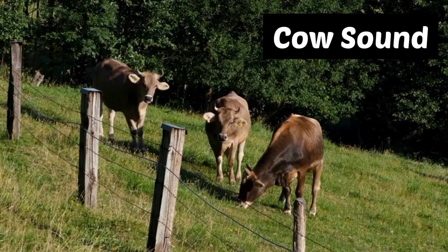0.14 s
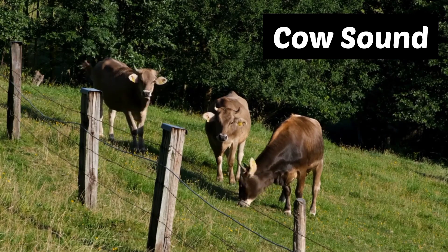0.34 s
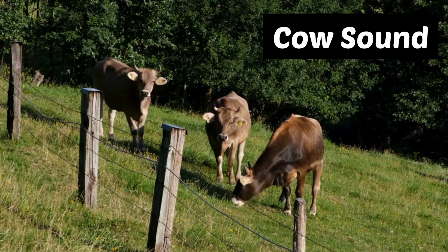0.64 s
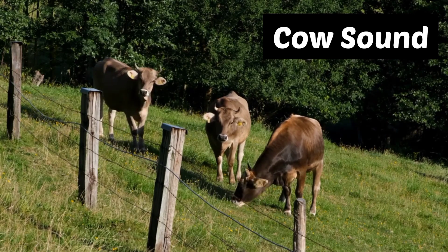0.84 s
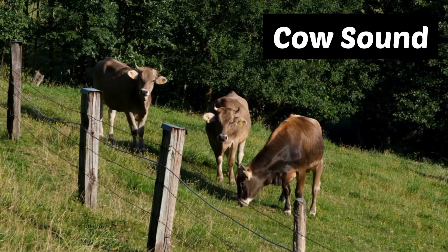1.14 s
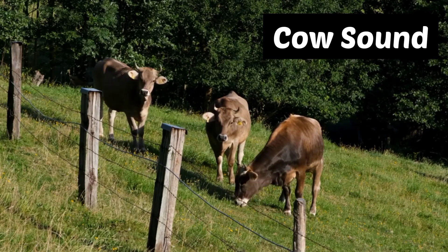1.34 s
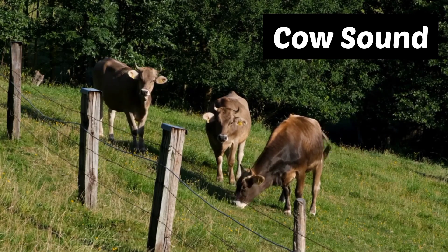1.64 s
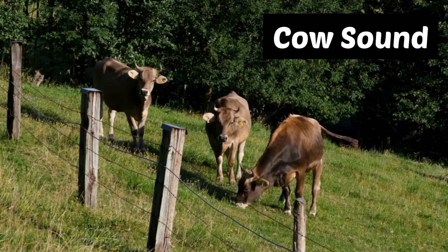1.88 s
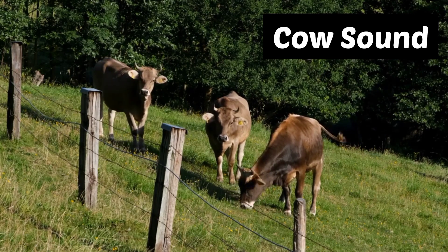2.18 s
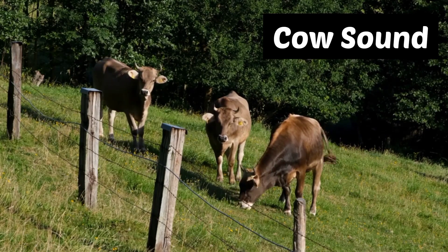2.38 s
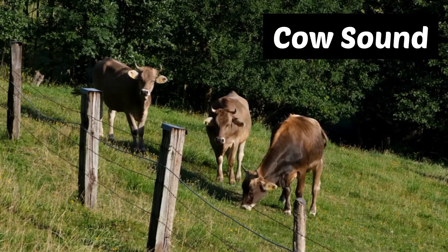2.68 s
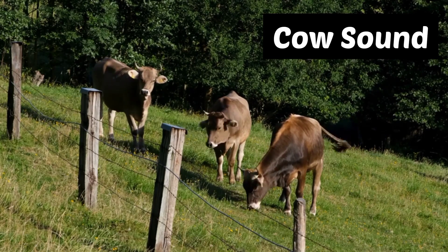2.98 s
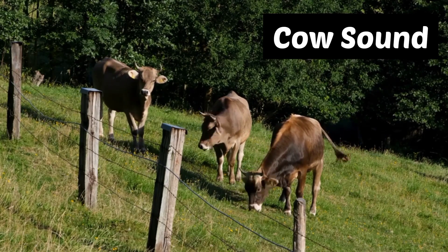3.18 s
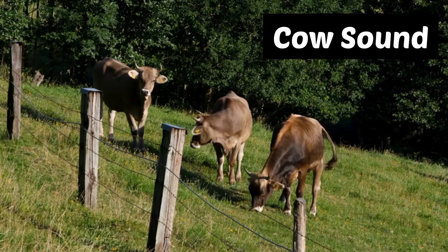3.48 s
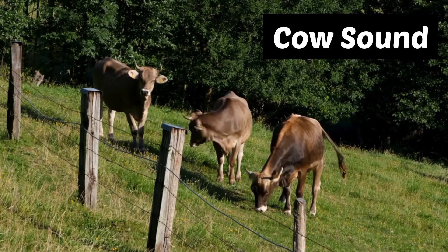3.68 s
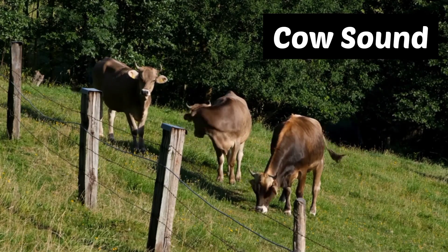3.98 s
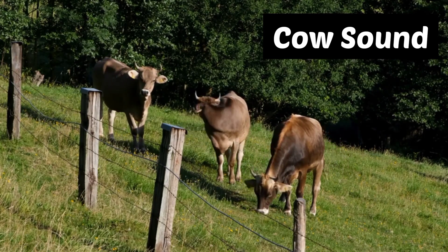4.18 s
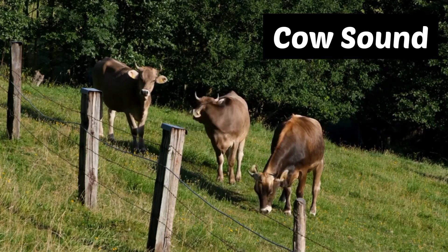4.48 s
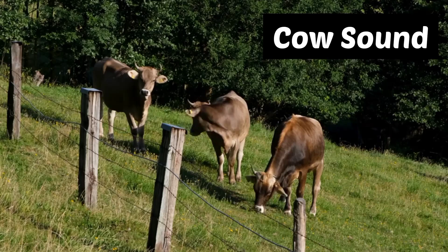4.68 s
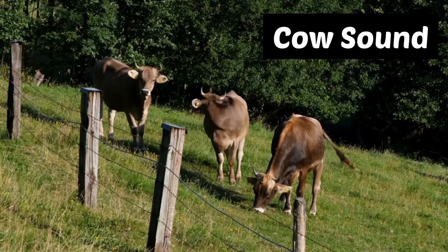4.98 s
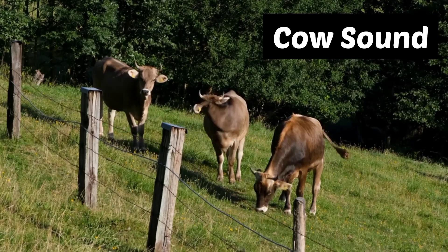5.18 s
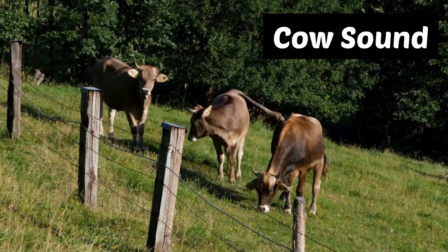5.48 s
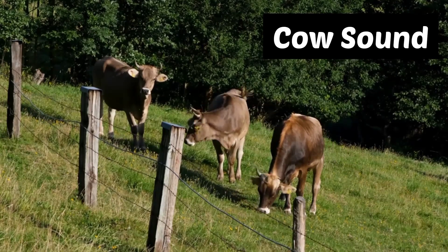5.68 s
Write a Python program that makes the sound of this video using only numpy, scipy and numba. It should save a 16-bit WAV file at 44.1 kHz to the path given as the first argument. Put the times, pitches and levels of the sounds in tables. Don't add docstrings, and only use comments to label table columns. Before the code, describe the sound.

Outdoors in a pasture, a soft low hum of wind and distant herd runs under sparrow chirps in short bursts. After about three seconds a close cow begins a slow nasal rattle that glides up into a loud, sustained moo. It cuts off abruptly, a tiny silent gap follows, then a distant cow's short falling hoot. Slightly dull treble, nearly mono sound with light echoes.

```python
import sys
import numpy as np
from scipy import signal
from scipy.fft import rfft, irfft, next_fast_len
from scipy.io import wavfile
from scipy.ndimage import uniform_filter1d
from numba import njit

SR = 44100
rng = np.random.default_rng(int(sys.argv[2]) if len(sys.argv) > 2 else 0)


def dump(signal):
    limited = np.clip(np.atleast_2d(signal).T, -1, 1)
    pcm = np.round(limited * 32767).astype(np.int16)
    wavfile.write(sys.argv[1], SR, pcm)


def nominal_scale(level):
    x = np.asarray(level, float) / 20
    return 10 ** x


N = 257103
TIME = np.arange(N) / SR


def columns(table):
    s, *rest = np.transpose(table)
    return [np.interp(TIME, s, c) for c in rest]


def steady(x, span_s):
    k = int(span_s * SR)
    power = uniform_filter1d(uniform_filter1d(x ** 2, k), k)
    return x / np.sqrt(power + 1e-18)


@njit
def svf(x, hz, width):
    y, b, l = np.empty(len(x)), 0., 0.
    for i in range(len(x)):
        g, k = np.tan(np.pi * hz[i] / SR), width / hz[i]
        v = (b + g * (x[i] - l)) / (1 + g * (g + k))
        b, l, y[i] = 2 * v - b, l + 2 * g * v, k * v
    return y


def ring(x, hz, width_hz):
    return svf(x, hz + np.zeros(N), float(width_hz))


def notch(x, hz, width_hz, depth):
    return x - np.clip(depth, 0, 1) * ring(x, hz, width_hz)


def walk(rate_hz):
    k = int(SR / rate_hz)
    held = np.repeat(rng.standard_normal(N // k + 1), k)
    return 2.255 * uniform_filter1d(uniform_filter1d(held, k), k)[:N]


# frequency in Hz, level in dB per Hz.
HUM_COLOUR = [(24, -85.5), (40, -56.5), (102, -23.5), (193, -9), (381, -6), (428, 0), (581, -13.5),
              (653, -11.5), (974, -22), (1100, -22.5), (2160, -28), (3980, -33), (5660, -33.5), (7870, -39),
              (10900, -45), (14200, -60.5), (22000, -120)]
# centre in Hz, width in Hz, gain in dB.
HUM_MODES = [(416, 215, -5), (676, 320, 1), (2693, 110, -10), (743, 28, 4.5), (584, 30, -8),
             (6960, 1300, -4)]
# time in seconds, herd and wind in dB, far flock chatter in dB.
HUM_LEVELS = [(0, -39, 5.5), (.68, -40, -1.5), (1.12, -43.5, -0.5), (1.34, -42, 5), (2.05, -41.5, -3.5),
              (2.3, -43, -2.5), (2.45, -41, 4.5), (2.7, -41, 5.5), (3.04, -40.5, 9), (3.25, -40.5, 12.5),
              (3.6, -33.5, 14.5), (4.2, -43, 10), (5.5, -50.5, 5), (5.56, -41.5, 5.5), (5.83, -42, 2.5)]
# centre in seconds, half length in seconds, gain in dB.
RUSTLE = (1.72, 0.16, 5.4)


def hum():
    herd_db, chatter_db = columns(HUM_LEVELS)
    usual_db = np.median(herd_db[:3 * SR])
    at_s, half_s, stir_db = RUSTLE
    rustle_db = stir_db * np.exp(-((TIME - at_s) / half_s) ** 2)
    size = next_fast_len(N)
    f = np.fft.rfftfreq(size, 1 / SR) + 1e-3
    curve_hz, curve_db = np.transpose(HUM_COLOUR)
    colour_db = np.interp(np.log(f), np.log(curve_hz), curve_db)
    colour_db = colour_db + sum(db / (1 + (2 * (f - hz) / w) ** 2) for hz, w, db in HUM_MODES)
    unlike = nominal_scale(-38) + nominal_scale(-22) * np.clip(f / 700, 0, 1) ** 2
    unlike = unlike + .3 * (f / 10000) ** 3 + 1 / (1 + (f / 45) ** 4)
    noise = rfft(rng.standard_normal((2, size))) * nominal_scale(colour_db) * [np.ones(len(f)), unlike]
    noise = noise / np.std(irfft(noise[0] * (f > 150) * (f < 900), size))
    out, swell = 0, walk(6.03)
    for hz in 25 * 2 ** np.arange(0, 9.1, .5):
        share = np.cos(np.pi / 2 * np.clip(2 * np.log2(f / hz), -1, 1)) ** 2
        if hz < 1000:
            db = herd_db
        elif hz < 4500:
            db = usual_db + .3 * chatter_db
        else:
            db = usual_db + chatter_db
        db = db + rustle_db * (1500 < hz < 2500) + 0.5 * swell + 1.23 * walk(12)
        out = out + irfft(noise * share, size)[:, :N] * nominal_scale(db)
    return out[0] + out[1] * np.array([[1], [-1]])


def warble(syllables):
    out = 0
    for syllable in syllables:
        hz, db = columns(syllable)
        sounding = (TIME > syllable[0][0]) & (TIME < syllable[-1][0])
        on = uniform_filter1d(1. * sounding, size=100)
        turns = np.cumsum(uniform_filter1d(hz, size=120)) / SR
        out = out + on * nominal_scale(db + 2.5) * np.sin(2 * np.pi * turns)
    return out * nominal_scale(1. * walk(200) + .8 * walk(900))


# time in seconds, pitch in Hz, level in dB.
WARBLES = [
    [(-.01, 3220, -43.5), (.006, 3290, -39.5), (.011, 3910, -40), (.018, 3920, -43.5), (.024, 4240, -42.5),
     (.03, 3990, -42), (.04, 4080, -36.5), (.046, 3800, -52)],
    [(.048, 3700, -47), (.058, 3800, -42), (.068, 4300, -43), (.083, 3665, -40), (.089, 4120, -50),
     (.096, 3600, -49)],
    [(1.24, 4150, -48), (1.255, 4560, -40), (1.264, 5350, -47)],
    [(1.264, 3890, -42.5), (1.274, 4160, -31), (1.292, 4280, -29), (1.302, 3650, -28), (1.315, 3225, -46),
     (1.326, 3680, -31), (1.329, 3520, -30)],
    [(1.331, 4090, -27), (1.335, 4295, -23.5), (1.344, 4260, -33), (1.353, 3750, -25.5), (1.358, 4210, -33),
     (1.368, 3610, -34), (1.379, 3220, -29)],
    [(1.379, 3293, -29.5), (1.398, 4300, -37), (1.416, 3710, -46.5), (1.424, 4000, -39), (1.438, 3210, -42),
     (1.45, 3750, -43), (1.47, 4270, -48)],
    [(1.478, 3700, -49), (1.5, 4280, -51), (1.515, 3750, -45), (1.532, 4300, -55)],
    [(2.75, 4340, -46), (2.758, 4500, -38), (2.768, 4670, -35), (2.775, 5360, -29)],
    [(2.774, 3034, -49), (2.781, 3830, -26), (2.79, 4450, -26.5), (2.803, 4200, -33), (2.817, 3590, -28),
     (2.824, 4230, -28), (2.833, 3200, -36)],
    [(2.835, 3194, -36.5), (2.844, 3847, -24), (2.853, 4300, -33), (2.868, 3597, -29), (2.875, 4060, -25.5),
     (2.879, 3590, -27), (2.888, 4400, -35.5), (2.895, 3250, -18)],
    [(2.897, 3320, -29.5), (2.908, 3910, -37.5), (2.918, 4400, -35), (2.93, 3650, -33), (2.94, 3900, -43),
     (2.956, 3244, -31), (2.975, 4100, -42)],
]
FLUTTER = (245, .42)
# centre in Hz, width in Hz.
BILL = (4000, 1500)


def sparrow():
    rate_hz, depth = FLUTTER
    beats = np.cumsum(rate_hz * (1 + .15 * walk(30))) / SR
    song = warble(WARBLES) * (1 + depth * np.sin(2 * np.pi * beats))
    t = np.arange(int(.03 * SR)) / SR
    twigs = rng.standard_normal(len(t)) * (rng.random(len(t)) < .02) * nominal_scale(-60 * t / .09)
    twigs = twigs / np.sqrt(np.sum(twigs ** 2))
    return ring(song + .9 * signal.fftconvolve(song, twigs)[:N], *BILL)


def whistles(notes, turn, flutter_db, grit_db, fade_db):
    out = np.zeros(2 * SR + N)
    for at_s, length_s, start_hz, end_hz, db in notes:
        u = np.arange(int(length_s * SR)) / (length_s * SR)
        turn_hz = start_hz + 0.38 * (end_hz - start_hz)
        hz = np.interp(u, [0, turn, 1], [start_hz, turn_hz, end_hz])
        hz = uniform_filter1d(hz, len(u) // 6, mode="nearest")
        shape = np.clip(u / 0.16, 0, 1) * np.clip((1 - u) / 0.071, 0, 1)
        i = int((at_s + 1) * SR)
        out[i:i + len(u)] += nominal_scale(db + 4.0 + fade_db * u) * shape * np.sin(2 * np.pi * np.cumsum(hz) / SR)
    return out[SR:SR + N] * nominal_scale(flutter_db * walk(150) + grit_db * walk(900))


# start in seconds, length in seconds, start in Hz, end in Hz, level in dB.
CHIPS = [
    (.555, 0.017, 5840, 6360, -65),
    (2.63, 0.017, 4150, 4960, -56),
    (2.617, 0.012, 5900, 7100, -45),
    (3.06, 0.022, 6290, 7300, -51.5),
    (3.165, .014, 4040, 5050, -45),
    (3.285, 0.012, 10200, 10700, -52.5),
    (3.295, .04, 2960, 3400, -48),
    (3.455, 0.053, 6460, 8000, -49.5),
    (3.465, 0.03, 4400, 5320, -39.5),
]


def chips():
    return nominal_scale(-2.0) * whistles(CHIPS, turn=0.5, flutter_db=4.0, grit_db=1.9, fade_db=2.0)


# time in seconds, pitch in Hz, level in dB.
HOOKS = [
    [(.85, 3450, -60), (.865, 3800, -59), (.878, 4150, -52), (.886, 3600, -58), (.9, 3800, -62)],
    [(.917, 3550, -60), (.93, 3800, -57), (.937, 4150, -48), (.944, 3550, -54), (.958, 3650, -60)],
    [(2.269, 4500, -57), (2.279, 3800, -54), (2.29, 3250, -64)],
    [(2.348, 8350, -49), (2.365, 7200, -55), (2.385, 7700, -48)],
    [(2.383, 3050, -58), (2.398, 3550, -47), (2.41, 3450, -58)],
    [(2.455, 3550, -54), (2.463, 4250, -50), (2.473, 3500, -56)],
    [(2.478, 3500, -56), (2.49, 3350, -46), (2.497, 4000, -47), (2.506, 4800, -54)],
    [(2.604, 4900, -45), (2.614, 5500, -43), (2.632, 5550, -47)],
    [(2.62, 3300, -53), (2.628, 4100, -42), (2.645, 3900, -50)],
    [(2.678, 3050, -55), (2.692, 3550, -47), (2.702, 3100, -52)],
    [(2.99, 5500, -48), (3.01, 5650, -45), (3.05, 5550, -46)],
    [(3.116, 5700, -47), (3.13, 5600, -43), (3.142, 3850, -44.5), (3.152, 3700, -44)],
    [(3.153, 3050, -42), (3.167, 3500, -42), (3.182, 3400, -46.5)],
    [(3.151, 6200, -43.5), (3.159, 6400, -33.5), (3.172, 7800, -42)],
    [(3.277, 5000, -44), (3.289, 5350, -34), (3.302, 6550, -32.5), (3.311, 6550, -42)],
]


def hooks():
    return warble(HOOKS)


# start in seconds, length in seconds, start in Hz, end in Hz, level in dB.
SEEPS = [(1.1, 0.16, 6070, 5600, -62), (1.14, 0.032, 5250, 4400, -59), (1.588, 0.055, 7900, 7500, -60),
         (1.634, 0.097, 7700, 6800, -61), (1.891, 0.066, 3790, 3010, -62),
         (2.402, 0.068, 7930, 7150, -54.5), (2.453, 0.0092, 6400, 5600, -54),
         (3.336, 0.053, 10450, 9900, -50.5), (3.393, 0.058, 10000, 8700, -49.5),
         (2.57, .014, 4500, 3600, -56), (2.381, 0.031, 6400, 5800, -55), (3.992, 0.027, 5374, 4680, -49.5)]


def seeps():
    return whistles(SEEPS, turn=0.42, flutter_db=2.3, grit_db=3.4, fade_db=-6.0)


# start in seconds, peak in dB, centre in Hz.
TICKS = [(1.54, -45.5, 2400), (1.549, -46.5, 3050), (1.93, -55.5, 8000), (2.108, -41, 895),
         (2.458, -47.5, 3800), (2.49, -47.5, 6500), (3.33, -50.5, 9800), (3.46, -43, 7340),
         (3.481, -41, 8700), (3.345, -51.5, 10100), (3.36, -54, 10000), (3.167, -46, 8300)]


def ticks():
    out = 0
    for at_s, db, hz in TICKS:
        decay = np.exp(-np.clip(TIME - at_s, 0, 1) / 0.009) * (TIME > at_s)
        out = out + nominal_scale(db + 17.5) * ring(decay * rng.standard_normal(N), hz, 0.27 * hz)
    return out


# time in seconds, rate in Hz.
FOLD_RATE = [(3.3, 60.66), (3.39, 71.3), (3.5, 83.9), (3.61, 97.54), (3.7, 108.4), (3.8, 116.1),
             (3.91, 127.5), (4.03, 137.6), (4.1, 142.9), (4.16, 148.7), (4.25, 156.1), (4.32, 161.3),
             (4.44, 165.2), (4.6, 162.3), (4.9, 167.9), (5.17, 173.2), (5.4, 172.6), (5.51, 167.5)]
# time in seconds, noise share 0-1.
BREATH = [(3.3, .13), (3.6, .12), (3.9, .08), (4.3, .075), (4.65, .095), (5.1, .07), (5.51, .05)]


def folds(hz, rattle):
    breath, = columns(BREATH)
    jitter = (.0011 + .001 * rattle) * walk(60)
    turns = np.cumsum(hz * (1 + jitter) * (TIME > FOLD_RATE[0][0])) / SR + .2
    r = np.exp(-hz / 4000)
    pulses = (1 - r * r) / (1 - 2 * r * np.cos(2 * np.pi * turns) + r * r) - 1
    pulses = pulses * np.sqrt(hz / 4000)
    puff = breath * 1.5 * np.exp(-(turns % 1) / .45) * rng.standard_normal(N)
    return turns, nominal_scale((.9 - .3 * rattle) * walk(50)) * pulses + puff, puff


# centre in Hz, width in Hz.
CHEEK = (542, 52)


def throat_voice(source, puff, hz, cheek_db):
    return ring(source - 0.34 * puff, hz, 104) - nominal_scale(cheek_db) * ring(source, *CHEEK)


# centre in Hz, width in Hz, level in dB re mouth, dB per rounding.
PALATE = [(593, 66, -10.5, -11.5), (1015.5, 78, -0.5, -19)]


def mouth_voice(source, puff, hz, rounding):
    mouth = ring(ring(source, hz, 77), hz, 380.0)
    for k, (f, w, db, per_round) in enumerate(PALATE):
        mouth = mouth + (-1) ** (k + 1) * nominal_scale(db + per_round * rounding) * ring(source + 2 * puff, f, w)
    return mouth


# centre in Hz, width in Hz, level in dB, dB per rounding, dB added in rattle.
LIPS_UPPER = [(1568, 96, -12, 8, 5), (1846, 113, -18, 12.5, 24.5)]
# fold rate in Hz where it settles, over how many Hz, from how many Hz higher.
LIPS_SETTLE = (140, 18, 90)


def lip_voice(source, puff, hz, fold_hz, rounding, rattle):
    settled_hz, over_hz, higher_hz = LIPS_SETTLE
    lift_hz = higher_hz * np.clip((settled_hz - fold_hz) / over_hz, 0, 1)
    lips = ring(source + 4 * puff, hz, 28)
    for k, (f, w, db, per_round, per_rattle) in enumerate(LIPS_UPPER):
        gain = (-1) ** k * nominal_scale(db + per_round * rounding + per_rattle * rattle)
        lips = lips - gain * ring(source + 5.4 * puff, f + k * lift_hz, w)
    return ring(lips, 1485.0, 1500.0)


# centre in Hz, width in Hz, level in dB.
NOSE = [(2348, 180, -1), (3083, 270, -2), (3400, 152, 1), (3800, 222, 4), (4400, 300, 1.5),
        (5170, 170, -10)]
# time in seconds, opening in dB, lowest resonance in dB, top resonances in dB.
NOSTRILS = [(3.3, -4, -9, -14), (3.326, 8, -17, -14), (3.38, 4.5, -15.5, -8.5), (3.42, 0, -12.5, -6.5),
            (3.62, 0, -1.5, -3.5), (3.72, 7.5, 7, -8), (3.84, 6, 10, -11), (3.89, 0.5, -3, -5.5),
            (4.25, 2, -2, 1), (4.4, -2.5, -6.5, 3.5), (4.56, -4, -7.5, 7.5), (4.7, 1.5, 9.5, 5.5),
            (4.9, 1.5, 8, 4), (5.1, -4, -1, 0), (5.3, -1.5, 1.5, -5), (5.5, -1.5, 2.5, 4.5)]
# time in seconds, resonances raised in %, second one in dB, fourth one in dB.
VELUM = [(3.3, -4, 2, -0.5), (3.45, -0.5, -0.5, -1), (3.55, -4.5, -0.5, 2), (3.66, -0.5, 2.5, -4.5),
         (3.85, 0, 3.5, -4.5), (4.2, -0.5, 1, -0.5), (4.5, -0.5, -3.5, -0.5), (4.8, 1.5, -2.5, 2),
         (5.05, 2, -2.5, 6.5), (5.2, 2.5, 5.5, 6), (5.5, 1, 3.5, 3)]
# centre in Hz, width in Hz, depth 0-1, depth per rounding.
NOSE_DIPS = [(2730, 120, 1, .3), (3295, 250, 0.11, 1.2), (4234, 45, 1, .1)]
# centre in Hz, width in Hz, level in dB re nose.
RASP = [(7000, 410, -41), (8300, 2500, -33), (10000, 670, -34.5)]


def nose_voice(airy, rounding, rattle):
    nostril_db, lean_db, top_db = columns(NOSTRILS)
    raised_pct, second_db, fourth_db = columns(VELUM)
    nose = 0
    for k, (f, w, db) in enumerate(NOSE):
        db = db + lean_db * (k == 0) + second_db * (k == 1) + fourth_db * (k == 3) + top_db * (k >= 4)
        wandering_hz = f * (1 + raised_pct / 100 + .006 * walk(4))
        nose = nose + nominal_scale(db + 1.2 * walk(8)) * ring(ring(airy, wandering_hz, w), f, 3 * w)
    for f, w, depth, per_round in NOSE_DIPS:
        nose = notch(nose, f, w, depth + per_round * rounding)
    nose = nominal_scale(nostril_db) * steady(nose, 0.094)
    for f, w, db in RASP:
        rasp_db = db + 4.7 * rattle + np.clip(1.6 * walk(12), -3, 3)
        nose = nose + nominal_scale(rasp_db) * steady(ring(ring(airy, f, w), f, w), .04)
    return nose


# centre in Hz, width in Hz, depth 0-1.
SINUS_DIP = (2044, 214, 1)
# centre in Hz, width in Hz, depth 0-1, depth per rounding.
TONGUE_DIPS = [(1137, 28, 1, -0.71), (1397.5, 120, 1, 0.11), (664, 50, 0.51, -0.15)]
# centre in Hz, width in Hz, share at rest, per jaw opening, per rounding.
TONGUE_HUMPS = [(400, 60, 0.63, -0.18, -0.85), (624, 70, 0.3, 1, -1.1)]
# centre in Hz, width in Hz, depth at rest, per jaw opening, per rounding.
SHUT_DIP = (539, 171.5, 0.56, 0, -3)


def head_cavities(voice, jaw, rounding):
    voice = notch(voice, *SINUS_DIP)
    for f, w, depth, per_round in TONGUE_DIPS:
        voice = notch(voice, f, w, depth + per_round * rounding)
    for f, w, rest, per_jaw, per_round in TONGUE_HUMPS:
        share = rest + per_jaw * jaw + per_round * rounding
        voice = voice + np.clip(share, 0, 2) * ring(voice, f, w)
    f, w, rest, per_jaw, per_round = SHUT_DIP
    return notch(voice, f, w, rest + per_jaw * jaw + per_round * rounding)


# time in seconds, level in dB.
EFFORT = [(3.3, -46.5), (3.35, -35.5), (3.4, -31), (3.52, -17), (3.61, -15), (3.66, -18), (3.9, -15),
          (4.12, -16), (4.3, -14.5), (4.8, -15), (5.1, -13), (5.5, -15)]
# time in seconds, jaw opening -1 to 1, lip rounding 0-1.
FACE = [(3.3, 1, 0.19), (3.62, 0.68, 0.05), (3.75, 0.082, 0.2), (3.88, -0.39, 0), (4.04, 0.17, 0.2),
        (4.2, 0.81, 0.02), (4.4, .88, 0.16), (4.62, 1, 0.1), (4.78, 0.59, 0.55), (4.87, 0.8, 0.55),
        (5.0, 0.33, .78), (5.15, 0.09, 0.83), (5.3, -0.27, 0.93), (5.45, -0.35, 0.97)]
RATTLE_HZ = (61, 126.3)
BANDS_DB = {"throat": (1, -2, -0.5, 5.5), "cheek": (-17.5, 1.5, 31, -1.5), "mouth": (0.11, 3.06, 0.17, 4.2),
            "lips": (-8, 4, 1, 0.5), "nose": (-25, 3, 6, 22.5)}
BANDS_HZ = {"throat": (308, -1.5, 51, -44), "mouth": (875, 44, 4, -95), "lips": (1300, 9.7, 7.6, 66)}
# delay in seconds, level in dB.
PIPE_ECHO = (0.004172, -6.5)
# time in seconds, level just before in dB, build-up in seconds.
JAW_DROP = (3.624, -11, 0.22)


def cow():
    (hz,), (effort_db,), (jaw, rounding) = columns(FOLD_RATE), columns(EFFORT), columns(FACE)
    hz = uniform_filter1d(hz, size=2200)
    slow_hz, clear_hz = RATTLE_HZ
    rattle = np.clip((clear_hz - hz) / (clear_hz - slow_hz), 0, 1)

    def law(rest, per_jaw, per_round, per_rattle):
        return rest + per_jaw * jaw + per_round * rounding + per_rattle * rattle

    throat_db, cheek_db, mouth_db, lips_db, nose_db = (law(*row) for row in BANDS_DB.values())
    throat_hz, mouth_hz, lips_hz = (law(*row) for row in BANDS_HZ.values())
    turns, source, puff = folds(hz, rattle)
    throat = throat_voice(source, puff, throat_hz, cheek_db)
    delay_s, echo_db = PIPE_ECHO
    source = source + nominal_scale(echo_db) * np.interp(TIME - delay_s, TIME, source)
    mouth = mouth_voice(source, puff, mouth_hz, rounding)
    lips = lip_voice(source, puff, lips_hz, hz, rounding, rattle)
    nose = nose_voice(source + (.8 + 1.2 * rattle) * puff, rounding, rattle)
    at_s, held_db, build_s = JAW_DROP
    jaw_db = held_db * np.exp(-np.abs(TIME - at_s) / build_s) * np.clip((at_s - TIME) / 0.0053, -.25, 1)
    voice = nominal_scale(throat_db + .7 * jaw_db) * steady(throat, 0.015)
    voice = voice - nominal_scale(mouth_db + jaw_db) * steady(mouth, 0.028)
    voice = voice - nominal_scale(lips_db) * steady(lips, 0.063) + nominal_scale(nose_db) * nose
    voice = head_cavities(voice, jaw, rounding)
    voice = signal.sosfilt(signal.ellip(6, .5, 50, 190., "high", fs=SR, output="sos"), voice)
    chest_db = np.interp(hz, [145, 156], [-32., -24.]) - 3 * rounding
    voice = voice + nominal_scale(chest_db) * np.sin(2 * np.pi * turns)
    return voice * nominal_scale(effort_db - 1.5) * np.clip((TIME - FOLD_RATE[0][0]) / 0.0073, 0, 1)


# time in seconds, pitch in Hz, level in dB.
FAR_MOO = [
    (5.59, 525, -52),
    (5.65, 494.7, -37),
    (5.698, 463, -40),
    (5.756, 469, -57),
    (5.772, 404, -36.5),
    (5.79, 424, -65),
]


def far_moo():
    hz, db = columns(FAR_MOO)
    sounding = (TIME > FAR_MOO[0][0]) & (TIME < FAR_MOO[-1][0])
    on = uniform_filter1d(1. * sounding, 600)
    return on * nominal_scale(db + 4.0) * np.sin(2 * np.pi * np.cumsum(hz) / SR)


def yard(x, t60_s, echo_db, side_db, sparse):
    t = np.arange(SR // 2) / SR
    taps = rng.standard_normal((2, len(t))) * (rng.random((2, len(t))) < sparse)
    taps = taps * nominal_scale(-60 * t / t60_s) * (t > .003)
    mid, side = (signal.fftconvolve(x, h / np.sqrt(np.sum(h ** 2)))[:N] for h in taps)
    return x + nominal_scale(echo_db) * mid + nominal_scale(side_db) * ring(side, 2300.0, 2600.) * np.array([[1], [-1]])


# cut in seconds, restart in seconds, fade-in in seconds.
SPLICE_S = (5.5064, 5.566, 0.006)


def scene():
    close = yard(sparrow() + hooks(), .55, -6.5, -25.5, .046)
    birds = close + yard(chips() + seeps() + ticks(), 0.42, -1.5, -30.0, 0.052)
    near = yard(cow(), .3, -12., -20., .02) * (TIME < SPLICE_S[1] - .02)
    return near + birds + far_moo() + hum()


def thin_treble(x, masked_db, from_hz, full_hz):
    f, _, cells = signal.stft(x, SR, nperseg=1024)
    power = np.mean(np.abs(cells) ** 2, axis=0)
    power = uniform_filter1d(uniform_filter1d(power, size=5, axis=1), size=3, axis=0)
    db = 10 * np.log10(power + 1e-18)
    around_db = uniform_filter1d(uniform_filter1d(db, size=55, axis=0), size=9, axis=1)
    margin_db = np.interp(f, [from_hz, full_hz], [-9, masked_db], left=-90)[:, None]
    rows, frames = db.shape
    patches = rng.standard_normal((rows // 5 + 1, frames // 6 + 1))
    margin_db = margin_db + 3.2 * np.kron(patches, np.ones((5, 6)))[:rows, :frames]
    kept = np.where(db < around_db + margin_db, .03, 1)
    return signal.istft(cells * kept, SR, nperseg=1024)[1][:, :N]


def top_cut(x):
    return signal.sosfilt(signal.butter(12, 11080, fs=SR, output="sos"), x)


# centre in Hz, width in Hz, depth 0-1.
CASE_DIPS = [(590., 40., .55), (8050., 900., .45)]


def record(dry):
    cut_s, restart_s, fade_s = SPLICE_S
    for hz, width_hz, depth in CASE_DIPS:
        dry = np.array([notch(c, hz, width_hz, depth) for c in dry])
    coupling = signal.butter(3, 200, "high", fs=SR, output="sos")
    bend = signal.sosfiltfilt(coupling, .8 * np.tanh(dry / .8) - dry)
    band = signal.sosfilt(signal.ellip(8, .2, 60, 11000, fs=SR, output="sos"), dry + bend)
    thinned = thin_treble(band, masked_db=-1.7, from_hz=2600., full_hz=5500.)
    gate = np.clip((cut_s - TIME) / 0.000087, 0, 1) + np.clip((TIME - restart_s) / fade_s, 0, 1)
    return top_cut(thinned * gate)


dry = scene()
out = record(dry)
dump(out)
```